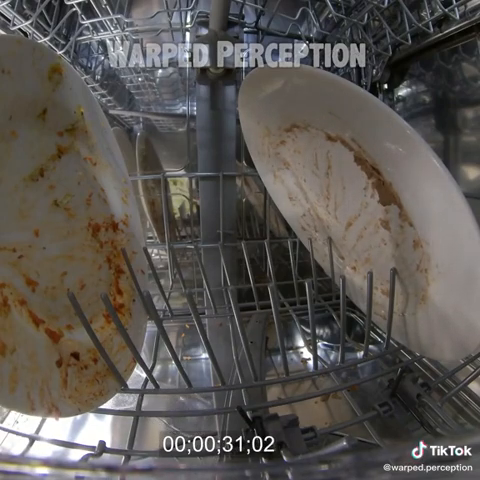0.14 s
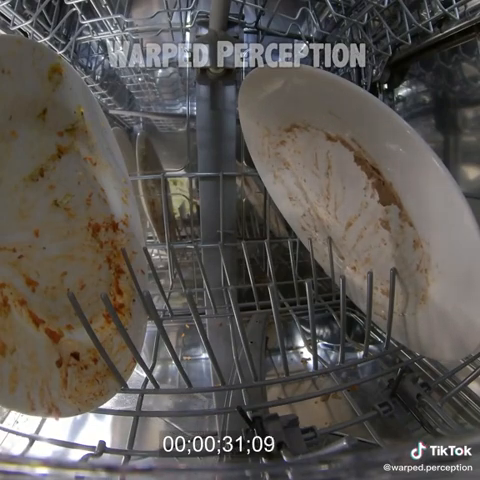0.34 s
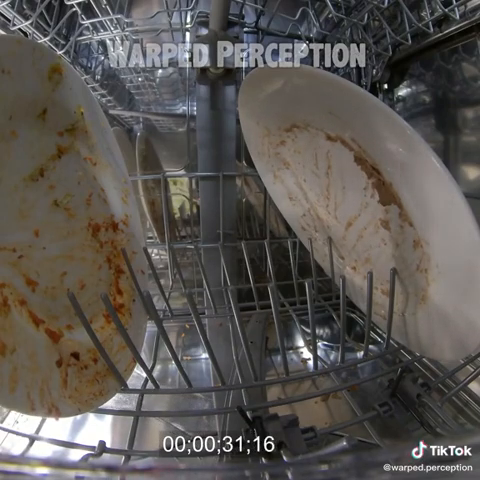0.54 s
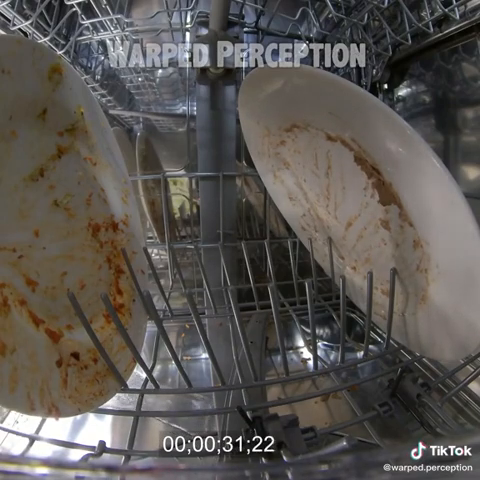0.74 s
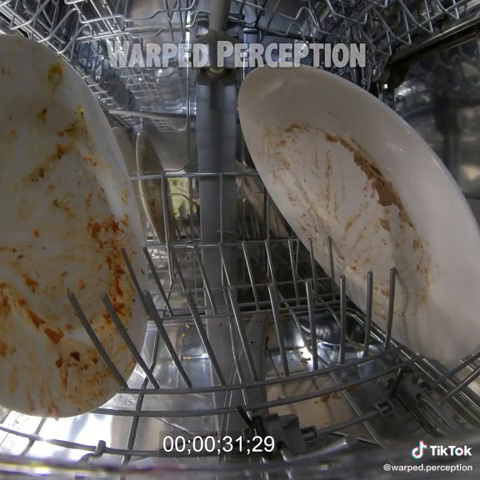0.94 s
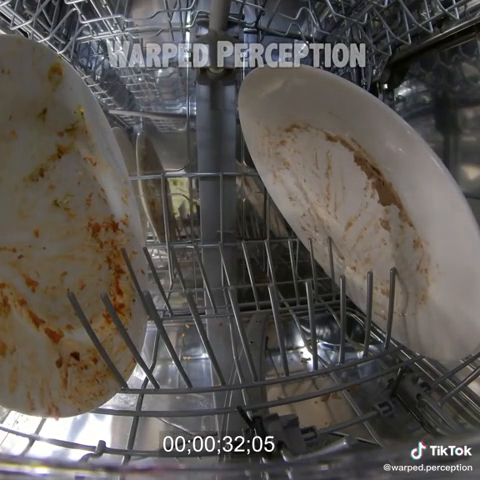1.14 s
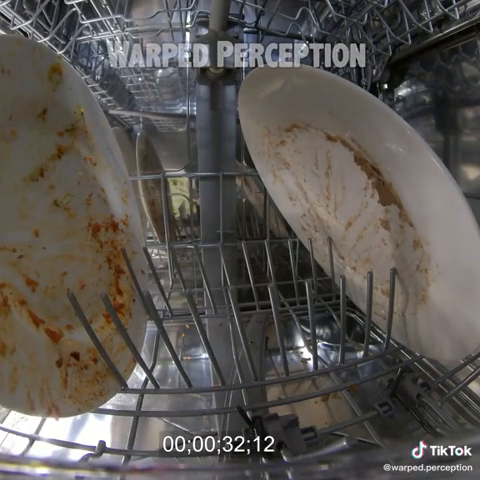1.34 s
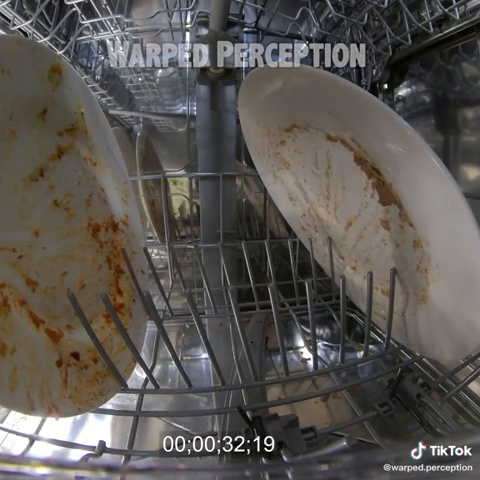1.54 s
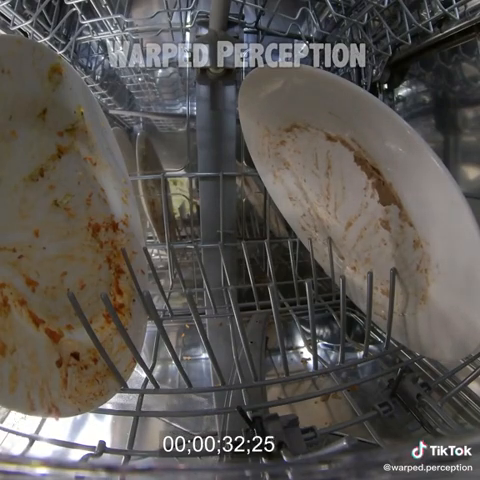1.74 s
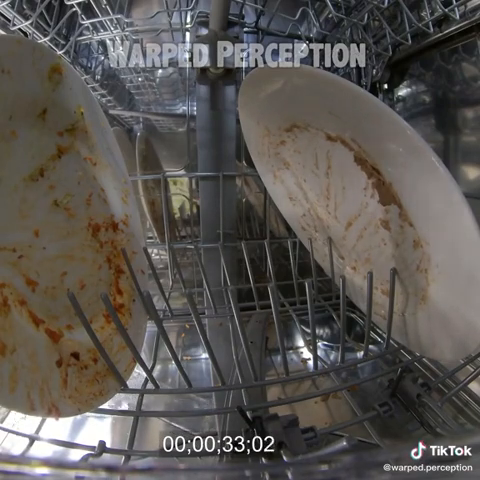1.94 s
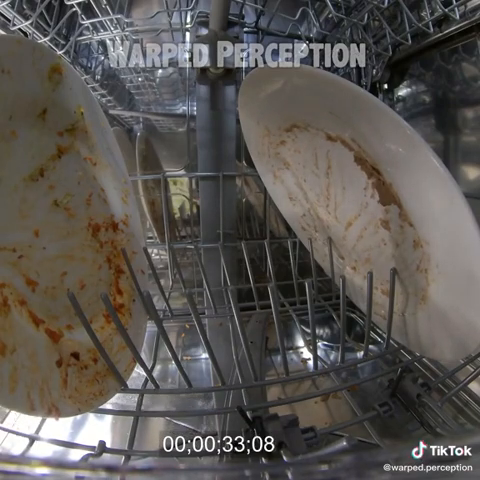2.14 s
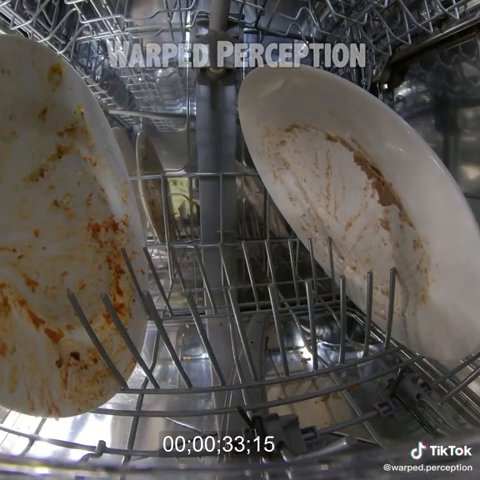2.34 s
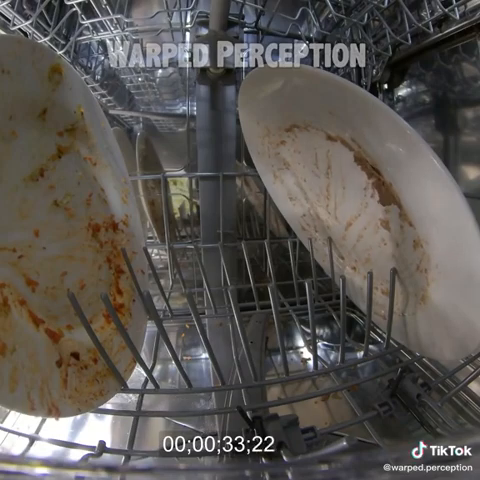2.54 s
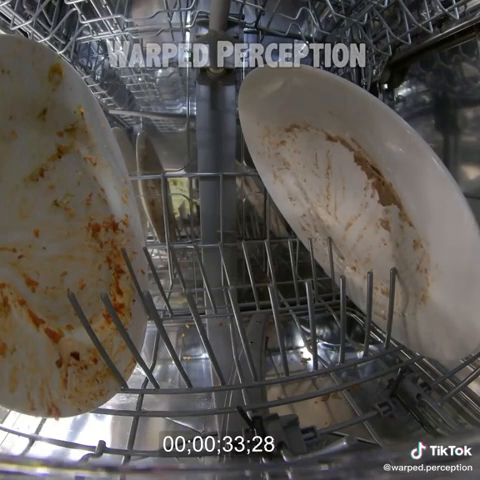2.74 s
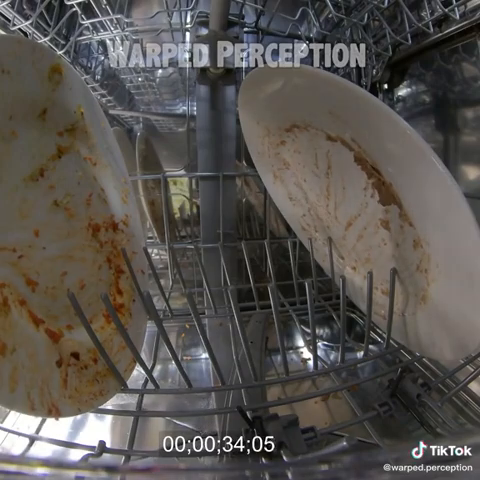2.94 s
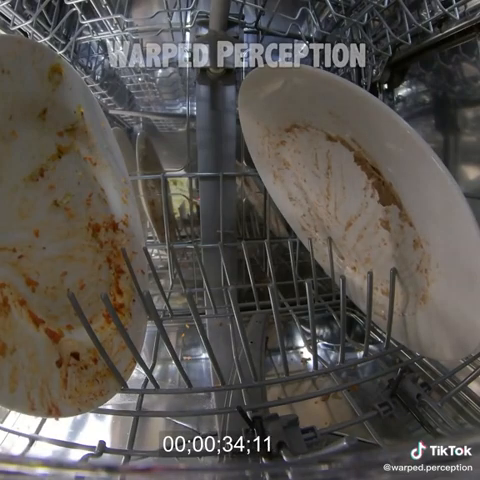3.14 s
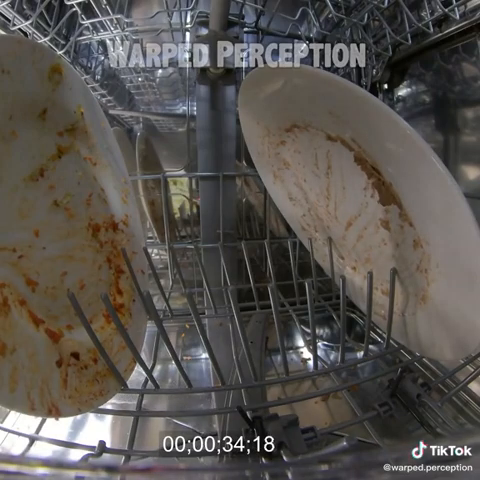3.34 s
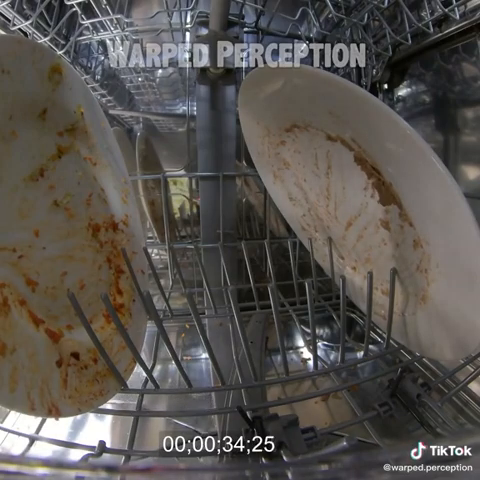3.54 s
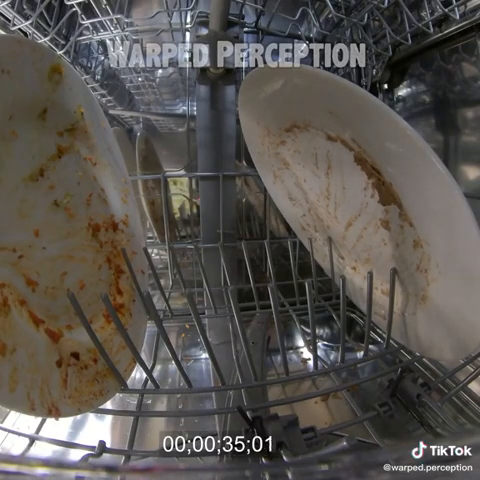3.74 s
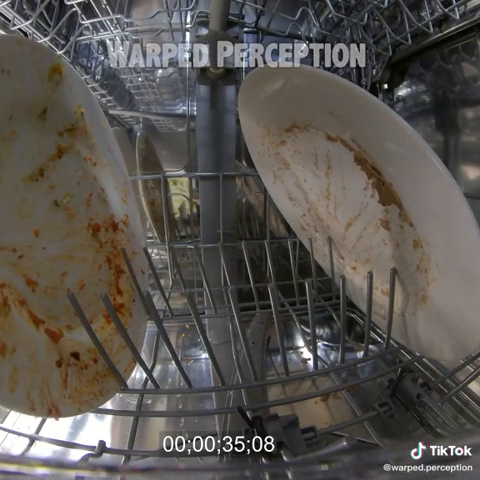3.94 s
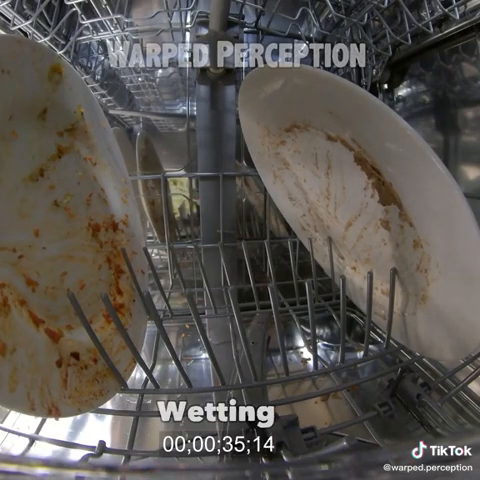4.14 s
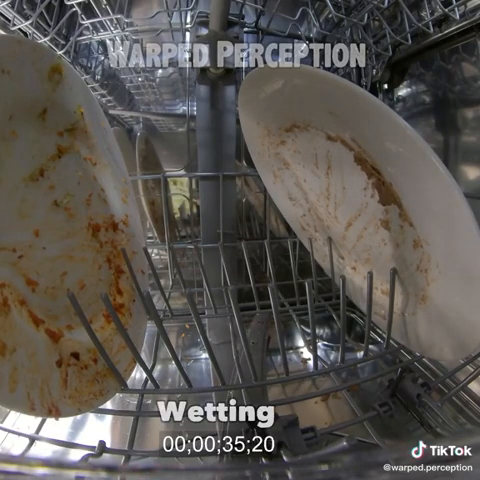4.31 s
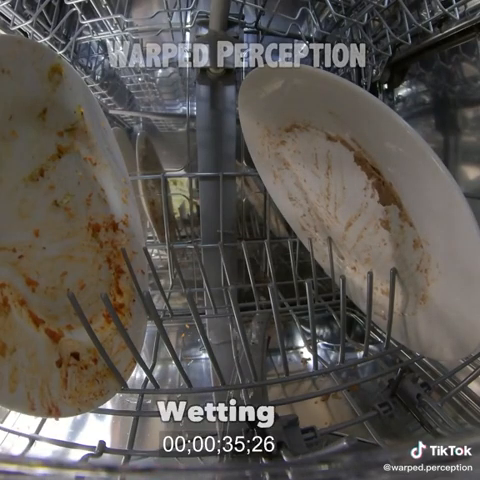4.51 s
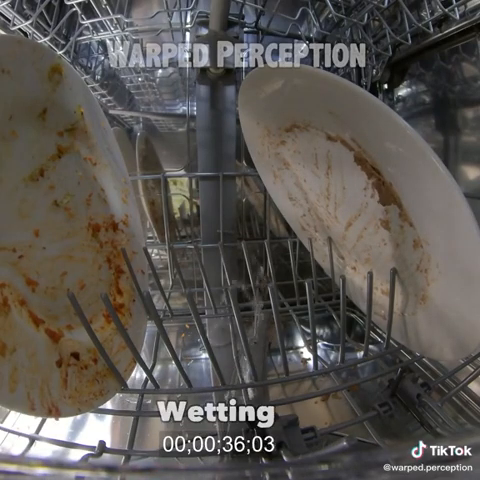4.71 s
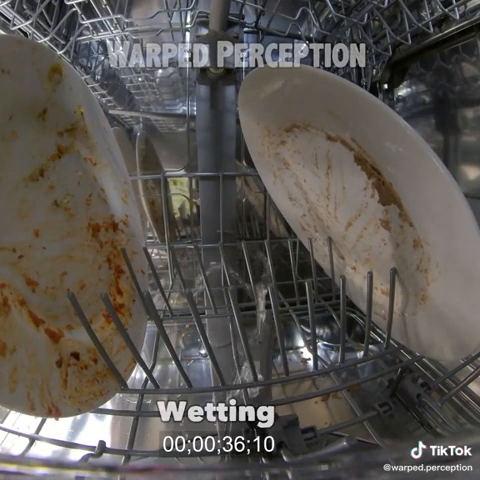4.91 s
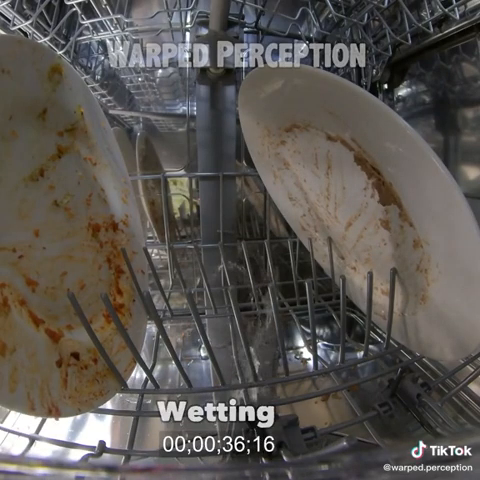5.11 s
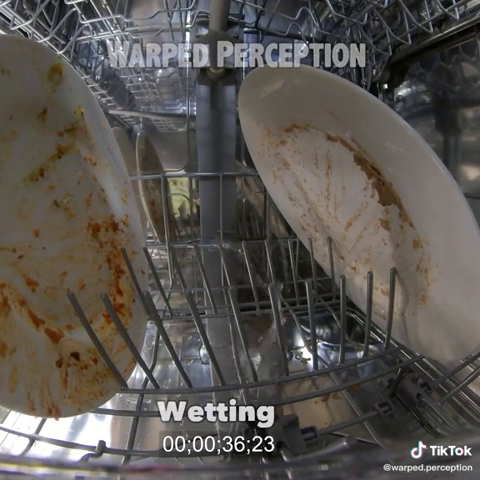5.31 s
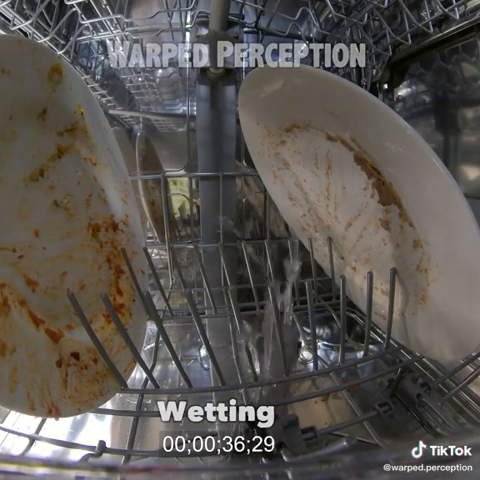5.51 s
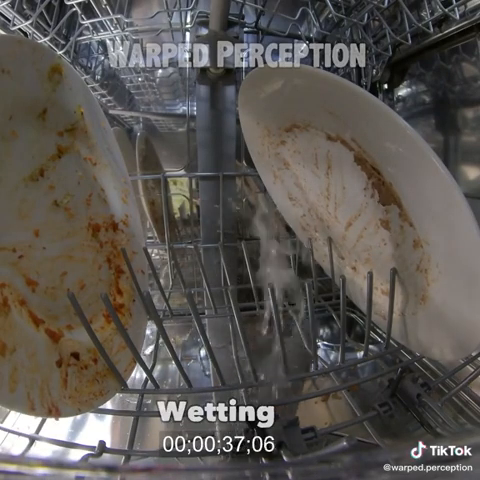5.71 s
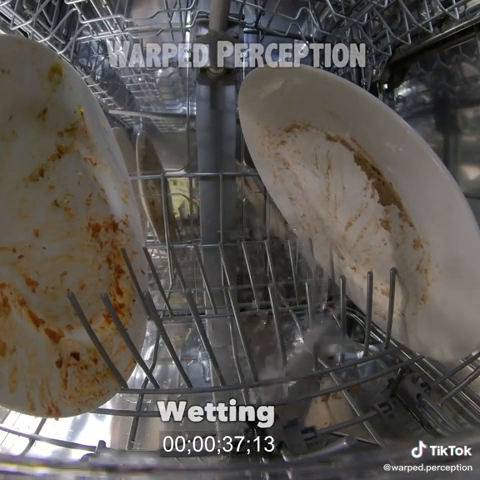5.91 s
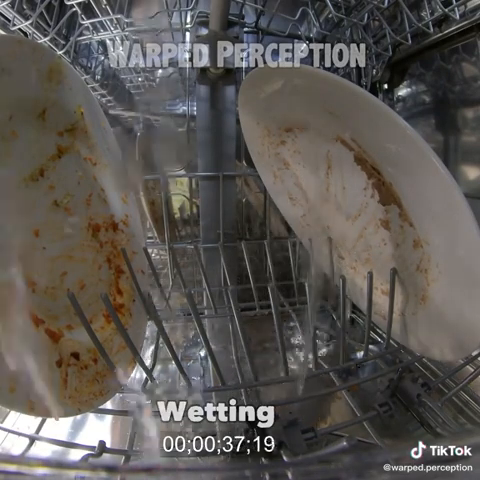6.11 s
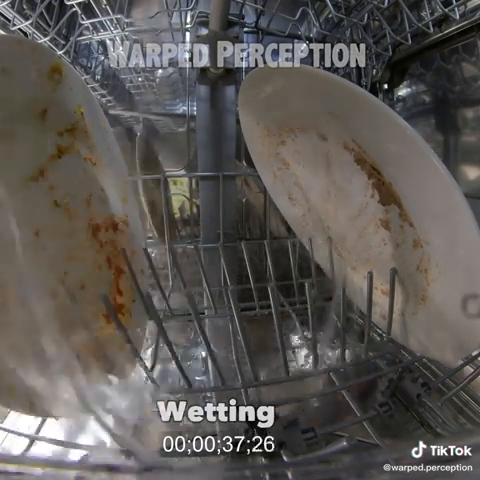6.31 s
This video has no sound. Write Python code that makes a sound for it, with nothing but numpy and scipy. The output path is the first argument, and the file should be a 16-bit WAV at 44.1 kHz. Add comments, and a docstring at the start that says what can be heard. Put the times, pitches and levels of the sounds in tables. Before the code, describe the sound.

Inside a dishwasher, water trickles and gurgles in over a low hum, stops, then a pump drones up and spray smacks close by.

```python
"""Water drops smack, ring and spatter on a camera's watertight case inside a dishwasher, as filtered noise and short tones.
Behind them jets splash the plates, built from random impacts that grow with the spray arm's pressure.
Before that, water runs into the sump and gurgles (pitched bubbles) over a low hum, then stops.
After a pause the wash pump starts: a wavering tone hums and noise-driven resonances drone in the steel tub."""
import sys
import numpy as np
from scipy import signal
from scipy.fft import rfft, irfft, next_fast_len
from scipy.io import wavfile
from scipy.ndimage import uniform_filter1d, map_coordinates

SR = 44100
rng = np.random.default_rng(int(sys.argv[2]) if len(sys.argv) > 2 else 0)


def to_wav(sig):
    """Store sig (one row per channel, or 1-D mono) as 16-bit WAV at the path in sys.argv[1].

    Samples outside -1..1 are clipped; the rate is SR.
    """
    pcm = np.clip(np.atleast_2d(sig), -1, 1) * 32767
    pcm = np.round(pcm).astype(np.int16)
    wavfile.write(sys.argv[1], SR, pcm.T)  # frames by channels


N = 284886

# All levels are ahead of the case's ports; t60 is the time to die by 60 dB.
# Thin steady hiss: (frequency [Hz], relative level [dB per Hz])
HISS_COLOUR = [(400, -23.5), (700, -13), (2000, -20), (5000, -34), (7000, -21), (7900, -25), (9700, -4.5),
               (11200, -17.5), (12800, -7.5), (14200, -17.5), (16000, -35)]
HISS_DB = -58
# Faint electrical hum, bare in the pause between filling and washing
MAINS_HZ, MAINS_DB = 121.1, -46.5

# Resonances of the sump, the hum, the tub, its walls, its panels, a plate and the case:
# (frequency [Hz], width [Hz], relative level [dB])
SUMP_MODES = [(55.6, 11.3, -2.5), (68.6, 9.9, -2.5), (87.5, 30, 2)]
HUM_MODES = [(121.2, 8.2, -12), (137.1, 15.2, -9.5)]
TUB_MODES = [(223.3, 26, -10.5), (266.2, 21, -5.5), (324.4, 27.6, -4), (358.3, 13.1, 0), (409.4, 26, -10)]
WALL_MODES = [(470, 24, 3), (575, 42, 1), (665.4, 28.4, -2), (754, 27.5, -2.5), (1023, 110, -14),
              (1316, 24, -10), (1596, 72, -13.5)]
PANEL_MODES = [(1130, 320, -4), (1590, 58, 0.5), (1946, 90, -5), (2610, 230, -11), (3070, 210, -6.5)]
PLATE_MODES = [(798, 210, -2.5), (998, 176, -5), (1288, 31, -1.5)]
CASE_MODES = [(795, 610, -4.5), (1356, 57, 7.5), (1915, 250, 4.5), (3107, 116, 17), (3880, 350, 12),
              (5430, 160, 0), (5700, 59, 7)]

# Strength of the incoming stream, used as swings about its average: (time [s], level [dB])
STREAM = [(0.0, -40.5), (0.27, -48.5), (0.42, -41.5), (0.67, -50.5), (0.69, -44.5), (1.29, -47.5),
          (1.49, -41), (2.06, -44), (2.08, -52.5), (2.22, -48.5), (2.52, -43)]
# Filling: the valve narrows and shuts, then the flow drains away
CLOSING_FROM_S, VALVE_SHUT_S, DRAIN_DB_PER_S = 2.086, 2.34, 34
RUN_ON_S = 0.44  # the sump runs on after the valve shuts
# Washing: the pump spins up, water reaches the spray arm, and its pressure climbs until it is full
PUMP_ON_S, SPIN_UP_S = 3.68, 0.093
PRIMED_S, PRIMING_S, FULL_PRESSURE_S = 3.926, 0.19, 5.63
# Load on the pump, surging while it draws air, used as swings about its average: (time [s], level [dB])
PUMP_LOAD = [(3.74, -29), (4.02, -33.5), (4.15, -25.5), (4.35, -27), (4.4, -30.5), (4.85, -22), (4.94, -29),
             (5.04, -24), (6.25, -26.5), (6.46, -25)]
# The turning arm: jets rise to the rack and sweep past the camera; their water pours back into the sump
RACK_REACHED_S, CLOSEST_S, SWEEP_S, RUNOFF_S = 5.6, 5.95, 0.51, 6.2
# Water hammer, as the valve shuts and as the arm spits out its air:
# (time [s], shudder level [dB], pitch [Hz], swell [s], t60 [s], sump churn level [dB])
SHUDDERS = [(2.385, -22.5, 49, 0.11, 0.4, -63), (4.706, -25, 82.5, 0.054, 0.13, -39),
            (4.825, -32, 48, 0.01, 0.061, -69)]

# Air pockets breaking in the sump: (time [s], level [dB], pitch [Hz], t60 [s])
GULPS = [(0.405, -52, 954, .35), (1.409, -33.5, 989, 0.27), (1.612, -40.5, 1100, 0.5),
         (1.655, -37, 1035, 0.17), (1.725, -40.5, 833, 0.36), (1.979, -36.5, 1009, 0.12),
         (2.228, -38.5, 794, 0.24), (2.268, -47, 1126, 0.31), (2.41, -37, 783, 0.46),
         (4.73, -40, 879, 0.095), (6.12, -23, 402, 0.48), (6.305, -34, 677, 0.42), (6.41, -42, 549, 0.35)]
# Hissing spurts at the inlet and the spray arm: (time [s], level [dB], t60 [s])
SPURTS = [(2.635, -56.5, 0.22), (2.855, -58, 0.26), (4.969, -51, 0.44)]
# Thin trickles that sing briefly on the rack: (time [s], level [dB], pitch [Hz])
TRICKLES = [(0.01, -38, 4180), (0.928, -46, 4060), (2.673, -48, 4380), (2.886, -52.5, 4090),
            (4.195, -64, 4230), (5.045, -37.5, 4440)]
# Splashes on the tub walls: (time [s], splash level [dB], t60 [s], body level [dB])
SPLASHES = [(0.019, -60, 0.71, -51.5), (0.301, -56.5, 0.19, -50), (0.56, -55, 0.6, -54),
            (0.672, -55.5, 0.36, -46), (0.853, -52.5, 0.05, -84), (0.926, -52.5, 0.26, -57),
            (1.011, -52.5, 0.34, -52), (1.66, -65, 0.74, -47.5), (1.773, -53.5, 0.33, -47),
            (1.889, -52, 0.26, -72), (2.044, -46.5, 0.018, -63), (2.115, -64, 0.18, -53),
            (2.478, -55.5, 0.8, -50.5), (2.642, -70, 0.2, -52.5), (2.85, -66, 0.59, -61.5),
            (4.518, -46.5, 0.2, -51.5), (4.703, -47, 0.34, -47.5), (4.977, -54, 1, -55.5)]
# Heavy drops landing on a plate: (time [s], level [dB])
PLATE_HITS = [(5.7425, -18.5), (5.942, -34), (6.0283, -30.5), (6.088, -39), (6.3063, -30.5)]
# Squirts of fine spray grazing the case: (time [s], level [dB], pitch [Hz], t60 [s])
SQUIRTS = [(4.524, -43, 12500, 0.069), (5.51, -38.5, 5930, 0.026), (5.664, -34.5, 8040, 0.095),
           (5.795, -30.5, 6630, 0.063), (5.828, -44, 3130, 0.036), (5.933, -30, 4560, 0.04),
           (5.945, -30.5, 4040, 0.057), (5.97, -32, 4500, 0.041), (5.991, -37, 3200, 0.058),
           (6.078, -28, 9930, 0.13), (6.153, -35.5, 9000, 0.044)]
# Fast droplets that tick on the case: (time [s], level [dB], pitch [Hz])
PINGS = [(5.869, -25, 6960), (5.9079, -20.5, 4770), (5.913, -18.5, 4940), (5.932, -26, 4740),
         (5.974, -32, 6200)]
# Drops on the case: (time [s], ring level [dB], ring pitch [Hz], smack level [dB],
# spatter level [dB], mist level [dB], left minus right [dB])
DROPS = [(5.08, -46, 4430, -46, -49, -29.5, 5.5), (5.121, -23, 3155, -33.5, -64, -55, -6.5),
         (5.1261, -13.5, 3870, -34, -62, -53.5, 4), (5.2333, -42, 3140, -28.5, -40.5, -48.5, 4),
         (5.2391, -23, 3800, -29, -41.5, -43.5, 3), (5.4296, -23, 3040, -38.5, -50, -48, 1.5),
         (5.44, -34, 2760, -55, -62, -71, 3), (5.4866, -17.5, 3714, -29, -40.5, -41.5, 4.5),
         (5.57, -40, 3200, -34.5, -37.5, -50, 4), (5.655, -24.5, 3190, -30.5, -35, -41, 1),
         (5.7425, -29, 3770, -29, -40, -45.5, 9.5), (6.0277, -31.5, 3450, -41, -62, -51.5, 2),
         (6.116, -28, 4050, -39, -33.5, -41.5, 2), (6.3068, -53, 6800, -53, -40.5, -31, 4.5)]

# Spectra of spurts, patter, wall splashes, spatter and the finest mist thrown off by a drop:
# (frequency [Hz], relative level [dB per Hz])
SPURT_COLOUR = [(3400, -30), (4000, 2.5), (4500, 2), (6200, 0), (7200, -10)]
PATTER_COLOUR = [(500, -36), (1000, 8.5), (2100, -2), (2750, 2.5), (3550, -0.5), (4300, 9.5), (5400, -15.5),
                 (6400, -4.5), (16000, -11)]
SPLASH_COLOUR = [(2800, -33), (3800, 2), (4350, 12.5), (5200, -15), (6300, -4), (8000, -7), (10000, 3),
                 (13000, -18), (16000, -22)]
SPATTER_COLOUR = [(2500, -52), (4500, -4.5), (6500, 5), (8000, 3), (9500, 7.5), (11500, -0.5), (13000, 1.5),
                  (16000, -28)]
MIST_COLOUR = [(10500, -35), (13000, 2.5), (16000, -6)]

# Balance of the case's two microphone ports: (frequency [Hz], left minus right [dB])
PORTS = [(120, -29.5), (260, -22.5), (600, -17), (1300, -5), (2400, -2), (4400, -1.5), (7500, 5.5),
         (10500, 8), (13500, -7.5)]
TOP_HZ = 15900  # band limit


def amp(db):
    """Decibels to gain."""
    return 10 ** (np.asarray(db) / 20)


def unit(x):
    """Scaled to rms 1."""
    return x / np.sqrt(np.mean(x ** 2) + 1e-20)


def along(points, hz):
    """Interpolates (frequency, value) points on a log frequency axis."""
    f, v = np.transpose(points)
    return np.interp(np.log(hz + 1), np.log(f + 1), v)


def wobble(rate):
    """A smooth random curve with rate knots a second."""
    knots = rng.standard_normal(int(N * rate / SR) + 4)
    return map_coordinates(knots, [np.arange(N) * rate / SR])


def filtered(x, response):
    """x times a complex response of frequency."""
    m = next_fast_len(N + SR // 2)
    return irfft(rfft(x, m) * response(np.fft.rfftfreq(m, 1 / SR)), m)[..., :N]


def coloured(x, spectrum):
    """x shaped by a spectrum, at rms 1."""
    return unit(filtered(x, lambda hz: amp(along(spectrum, hz))))


def resonating(x, modes, low_hz, high_hz):
    """x through resonances that are driven mainly between two frequencies, at rms 1."""
    def response(f):
        body = 0
        for k, (centre, width, db) in enumerate(modes):
            mode = 1j * f * width / (centre * centre - f * f + 1j * f * width)
            body = body + (-1) ** k * amp(db) * mode  # neighbours in opposite phase
        drive = 1 / np.sqrt((1 + (low_hz / (f + 1)) ** 8) * (1 + (f / high_hz) ** 8))
        return body * drive
    return unit(filtered(x, response))


def pair(x, alike):
    """Two unrelated signals mixed to a given left-right likeness."""
    turn = np.arccos(np.clip(alike, -1, 1)) / 2
    return np.cos(turn) * x[0] + np.sin(turn) * x[1] * np.array([[1], [-1]])


def noise(alike):
    """White stereo noise."""
    return pair(rng.standard_normal((2, N)), alike)


def steadied(x, span):
    """Noise with its swells slower than span seconds evened out, at rms 1."""
    power = uniform_filter1d(x ** 2, max(int(span * SR), 2), axis=-1)
    return unit(x / np.sqrt(np.abs(power) + 1e-6))


def droplets(rate, alike):
    """Tiny impacts of scattered size at random moments, at rms 1."""
    hits = rng.random((2, N)) < rate / SR
    return unit(pair(hits * rng.standard_normal((2, N)), alike))


def bubbles(count, pitch_hz, spread, cycles):
    """Bubbles that ring for some cycles and rise in pitch as they surface, at rms 1."""
    start, size, strength = rng.random((count, 1)), rng.standard_normal((count, 1)), rng.random((count, 1))
    hz = pitch_hz * np.exp(spread * size)
    t = np.arange(SR // 16) / SR
    age = t * hz / cycles
    tone = np.sin(2 * np.pi * hz * t * (1 + 0.024 * np.minimum(age, 2)))
    ring = strength * tone * np.exp(-3 * age) * (1 - np.exp(-20 * age))
    where = (start * N).astype(int) + np.arange(len(t))
    return unit(np.bincount(where.ravel(), ring.ravel(), N)[:N])


def burst(s, attack, t60):
    """An envelope of peak 1 that swells at time s and dies away, cut off after half a second."""
    shape, t = np.zeros(N + SR), np.arange(SR // 2) / SR
    shape[round(s * SR):][:len(t)] = (1 - np.exp(-(t / attack) ** 2)) * amp(-60 * t / max(t60, .002))
    return shape[:N] / shape.max()


def tone(s, hz, waver=0):
    """A sine counted from time s, its phase shifted by waver [radians]."""
    return np.sin(2 * np.pi * hz * (np.arange(N) / SR - s) + waver)


def tub(x, t60):
    """The dense, brief answer of the steel box: a decaying noise tail."""
    t = np.arange(SR // 3) / SR
    tail = rng.standard_normal((2, len(t))) * amp(-60 * t / t60)
    return signal.fftconvolve(x, tail / np.linalg.norm(tail[0]), axes=1)[:, :N]


def patchy(x, depth_db, span_hz, span):
    """x with random patches of gain, knots span_hz and span seconds apart, at rms 1."""
    hz, t, z = signal.stft(x, SR, nperseg=256)
    grid = np.meshgrid(hz / span_hz, t / span, indexing="ij")  # knots across pitch and time
    field = map_coordinates(rng.standard_normal(z.shape[1:]), grid, order=1, mode="mirror")
    return unit(signal.istft(z * amp(depth_db * field), SR, nperseg=256)[1][:, :N])


def panned(db):
    """Left and right gains for a level difference."""
    return amp(np.array([[db], [-db]]) / 2)


def since(s):
    """Seconds gone by since time s, zero before it."""
    return np.maximum(np.arange(N) / SR - s, 0)


def ramp(s, length):
    """Rises from 0 to 1, starting at time s."""
    return np.minimum(since(s) / max(length, .001), 1)


def together(*gains):
    """The level of unrelated excitations acting at once."""
    return np.sqrt(sum(g ** 2 for g in gains))


def swings(rows):
    """A (time, dB) curve about the average of its points."""
    s, db = np.transpose(rows)
    return np.interp(np.arange(N) / SR, s, db) - np.mean(db)


def filling(db, follows, run_on):
    """Gain fed by the inlet: it follows the stream, then drains away once the valve has shut."""
    return amp(db + follows * swings(STREAM) - DRAIN_DB_PER_S * since(VALVE_SHUT_S + run_on))


def closing():
    """The narrowing of the inlet valve, from 0 to 1."""
    return ramp(CLOSING_FROM_S, 0.31)


def pumping(db, follows):
    """Gain driven by the pump: it starts with the motor and follows its load."""
    return ramp(PUMP_ON_S, SPIN_UP_S) * amp(db + follows * swings(PUMP_LOAD))


def spraying(full_db, growth_db):
    """Gain driven by the spray arm: it starts once the arm is primed and grows with the pressure."""
    pressure = ramp(PRIMED_S, FULL_PRESSURE_S - PRIMED_S)
    return ramp(PRIMED_S, PRIMING_S) * amp(full_db - growth_db * (1 - pressure))


def passing(closest_db, falloff):
    """Gain that swells as the jet sweeps past the camera and fades with its distance."""
    distance = np.hypot(1, (np.arange(N) / SR - CLOSEST_S) / SWEEP_S)
    return ramp(PRIMED_S, PRIMING_S) * amp(closest_db) / distance ** falloff


def surges():
    """Gain of the water thrown about by each shudder."""
    return sum(amp(db) * burst(s, swell, t60) for s, _, _, swell, t60, db in SHUDDERS)


def hiss():
    """A thin steady noise that flutters slightly."""
    flutter_db = 1.3 * wobble(30)
    return amp(HISS_DB + flutter_db) * coloured(noise(alike=0.033), HISS_COLOUR)


def mains():
    """Electrical hum as a steady sine."""
    return amp(MAINS_DB) * unit(np.sin(2 * np.pi * MAINS_HZ * np.arange(N) / SR))


def rumble():
    """Turbulence drives the lowest resonances of the sump, harder as the valve narrows."""
    inlet = filling(db=-39.0, follows=0.69, run_on=0.17) * amp(9.5 * closing())
    sump_run = filling(db=-40.5, follows=0, run_on=RUN_ON_S)
    gain = together(inlet, sump_run, amp(-49.0), pumping(db=-33.5, follows=0.27))
    return gain * steadied(resonating(noise(alike=1.0), SUMP_MODES, low_hz=26, high_hz=118), span=0.13)


def throb():
    """The running pump throbs as one low noise-driven resonance."""
    low = resonating(noise(alike=0.7), [(85.1, 9.4, 0)], low_hz=50, high_hz=110)
    return pumping(db=-31, follows=0.15) * steadied(low, span=0.17)


def hum():
    """Turbulence hums through two resonances until the pump holds it to a wavering note."""
    inlet = filling(db=-37.0, follows=0.23, run_on=RUN_ON_S) * amp(7.2 * closing())
    gain = together(inlet, amp(-63), pumping(db=-27.0, follows=1.0))
    turbulent = steadied(resonating(noise(alike=0.91), HUM_MODES, low_hz=99, high_hz=238), span=0.15)
    pump_hz = 133.5 + 4.4 * wobble(24) - 21 * (1 - ramp(PUMP_ON_S, 0.14))
    note = unit(amp(0.87 * wobble(19)) * np.sin(2 * np.pi * np.cumsum(pump_hz) / SR))
    # the note roughens as the flow grows
    share = np.clip(0.76 * ramp(PUMP_ON_S, 0.015) - 1.0 * ramp(RACK_REACHED_S, 0.53), 0, 1)
    return gain * (np.sqrt(share) * note + np.sqrt(1 - share) * turbulent)


def drone():
    """Water drives the tub's resonances; while it runs in, one wall mode sings out over the rest."""
    inlet = filling(db=-36.5, follows=0.22, run_on=RUN_ON_S)
    gain = together(inlet, amp(-60), spraying(full_db=-29.5, growth_db=10.5), amp(12.0) * surges())
    walls = steadied(resonating(noise(alike=0.55), TUB_MODES, low_hz=175, high_hz=480), span=0.14)
    singing_modes = [(351.3, 5.3, 3), (264.0, 13.7, -16.5)]
    singing = steadied(resonating(noise(alike=0.61), singing_modes, low_hz=220, high_hz=382), span=0.088)
    inflow = np.clip(0.6 - 0.65 * closing(), 0, 1)
    return gain * (np.sqrt(inflow) * singing + np.sqrt(1 - inflow) * walls)


def thump():
    """The water shudders in the pipes when its flow changes abruptly: bursts of low resonant noise."""
    out = np.zeros((2, N))
    for s, db, hz, swell, t60, _ in SHUDDERS:
        shudder = resonating(noise(alike=1.0), [(hz, 11, 0)], low_hz=0.8 * hz, high_hz=1.4 * hz)
        out += amp(db) * burst(s, swell, t60) * steadied(shudder, span=0.1)
    return out


def sump():
    """Churning, frothing water rings the walls: bubbles and noise through their resonances."""
    runoff = amp(-41.0) * ramp(RUNOFF_S, 0.27)
    inlet = filling(db=-43.5, follows=1.0, run_on=0)
    churn = together(inlet, amp(-71), spraying(full_db=-46.0, growth_db=11.5), surges(), runoff)
    froth = np.array([bubbles(count=2000, pitch_hz=756.8, spread=0.36, cycles=36.5) for _ in range(2)])
    water = pair(froth, alike=0.14) + 2 * noise(alike=0.56)
    ringing = steadied(resonating(water, WALL_MODES, low_hz=420, high_hz=1930), span=0.045)
    return churn * amp(1.26 * wobble(11)) * ringing


def gulps():
    """An air pocket breaks with a wavering note in a cloud of smaller bubbles, made of narrow noise."""
    waver = 0.67 * wobble(80)  # the pocket changes shape as it rises
    out = np.zeros((2, N))
    for s, db, hz, t60 in GULPS:
        cloud = resonating(noise(alike=0.2), [(hz, 0.22 * hz, 0)], low_hz=0.5 * hz, high_hz=1.3 * hz)
        voice = 0.66 * tone(s, hz, waver) + amp(-7) * steadied(cloud, span=0.012)
        out += amp(db) * burst(s, attack=0.0048, t60=t60) * voice
    return out


def spurts():
    """Water and air hiss briefly through a nozzle: bursts of coloured noise."""
    gain = sum(amp(db) * burst(s, attack=0.018, t60=t60) for s, db, t60 in SPURTS)
    return gain * coloured(noise(alike=0.17), SPURT_COLOUR)


def trickles():
    """A trickle sings a high, unsteady note that soon dies."""
    waver = np.array([1.56 * wobble(380) for _ in range(2)])
    return sum(amp(db) * burst(s, attack=0.012, t60=0.17) * tone(s, hz, waver) for s, db, hz in TRICKLES)


def falling_water():
    """Water patters on steel and plates, with heavier splashes where it sweeps a wall."""
    inlet = filling(db=-55.5, follows=0.25, run_on=0.047)
    fall = together(inlet, amp(-81.0), passing(closest_db=-45.0, falloff=2.64))
    grains = unit(tub(droplets(rate=1500, alike=0.33), t60=0.075))
    texture = patchy(coloured(grains, PATTER_COLOUR), depth_db=8.0, span_hz=405, span=.04)
    patter = fall * amp(3.1 * wobble(21.92)) * texture
    sweeps, bodies = np.zeros((2, N))
    for s, db, t60, body_db in SPLASHES:
        shape = burst(s, attack=0.015, t60=t60)
        sweeps += amp(db) * shape
        bodies += amp(body_db) * shape
    sheet = tub(droplets(rate=3000, alike=1.0), t60=0.2)
    body = resonating(sheet, PANEL_MODES, low_hz=900, high_hz=3660)
    return patter + together(bodies, .5 * fall) * body + sweeps * coloured(sheet, SPLASH_COLOUR)


def plate():
    """Jets drum on a plate in uneven surges, and the heaviest drops ring its resonances."""
    force = together(spraying(full_db=-57.0, growth_db=3.5), amp(-49.0) * ramp(RACK_REACHED_S, 0.36))
    drumming = resonating(droplets(rate=1200, alike=0.16), PLATE_MODES, low_hz=646, high_hz=1470)
    rings = np.zeros(N)
    for s, db in PLATE_HITS:
        for hz, width, mode_db in PLATE_MODES:
            t60 = np.log(1000) / (np.pi * width)  # a wider resonance dies sooner
            rings += amp(db + mode_db) * burst(s, attack=0.0012, t60=t60) * tone(s, hz)
    return force * amp(2.0 * wobble(21)) * drumming + rings


def mist():
    """Fine spray prickles on the case, fuller once the jets reach the rack, and small drops patter on it."""
    wetting = together(spraying(full_db=-60.5, growth_db=22.0), amp(-50.5) * ramp(RACK_REACHED_S, 0.029))
    grains = coloured(tub(droplets(rate=1800, alike=0.24), t60=0.046), SPATTER_COLOUR)
    prickle = patchy(grains, depth_db=4.0, span_hz=1460, span=0.0075)
    taps = resonating(droplets(rate=170, alike=0.6), CASE_MODES, low_hz=2000, high_hz=8000)
    patter = passing(closest_db=-52, falloff=2.95) * taps
    return wetting * amp(2.7 * wobble(22)) * prickle + patter


def squirts():
    """A thread of spray breaks on the case as a short, pitched fizz of resonant noise."""
    out = np.zeros((2, N))
    for s, db, hz, t60 in SQUIRTS:
        fizz = resonating(noise(alike=0.31), [(hz, 0.15 * hz, 0)], low_hz=0.13 * hz, high_hz=2.0 * hz)
        out += amp(db) * burst(s, attack=0.0024, t60=t60) * steadied(fizz, span=0.016)
    return out


def pings():
    """A fast droplet strikes the case with a hard, pitched tick."""
    waver = 0.95 * wobble(2500)
    return sum(amp(db) * burst(s, attack=0.0002, t60=0.0088) * tone(s, hz, waver) for s, db, hz in PINGS)


def drops():
    """Each drop spreads over the case with a smack, rings a short wet note and bursts into spatter and mist."""
    rings, smacks, spatters, mists = np.zeros((4, 2, N))
    spread = .0035  # seconds for a drop to flatten
    waver = .5 * wobble(400)  # the water film moves and smears the note
    for s, db, hz, smack_db, spatter_db, mist_db, pan_db in DROPS:
        side = panned(pan_db)
        rings += side * amp(db) * burst(s, attack=spread, t60=0.016) * tone(s, hz, waver)
        smacks += side * amp(smack_db) * burst(s, attack=spread, t60=0.021)
        flight = side * burst(s, attack=0.0051, t60=0.023)
        spatters += amp(spatter_db) * flight
        mists += amp(mist_db) * flight
    smack = steadied(resonating(noise(alike=1.0), CASE_MODES, low_hz=600, high_hz=7000), span=0.0016)
    grains = coloured(droplets(rate=2200, alike=1.0), SPATTER_COLOUR)
    spatter = patchy(grains, depth_db=3.5, span_hz=900, span=0.011)
    fine = coloured(droplets(rate=11000, alike=0.38), MIST_COLOUR)
    return rings + smacks * smack + spatters * spatter + mists * fine


def scene():
    """Hiss, machine and water, with the sounds on the case also echoed by the tub."""
    machine = mains() + rumble() + throb() + hum() + drone() + thump()
    water = sump() + gulps() + spurts() + trickles() + falling_water() + plate() + mist()
    near = squirts() + pings() + drops()
    return hiss() + machine + water + near + amp(-5) * tub(near, t60=0.075)


def record(dry):
    """The case passes the bass mostly to the right port; nothing is kept above the band limit."""
    def ports(hz):
        ratio = amp(along(PORTS, hz))
        return 2 * np.array([ratio, np.ones_like(ratio)]) / (1 + ratio) * (hz < TOP_HZ)
    return filtered(dry, ports)


dry = scene()
out = record(dry)
to_wav(out)
```